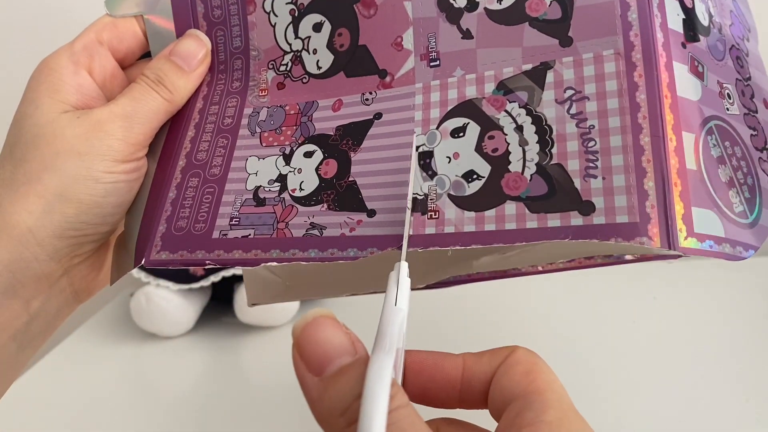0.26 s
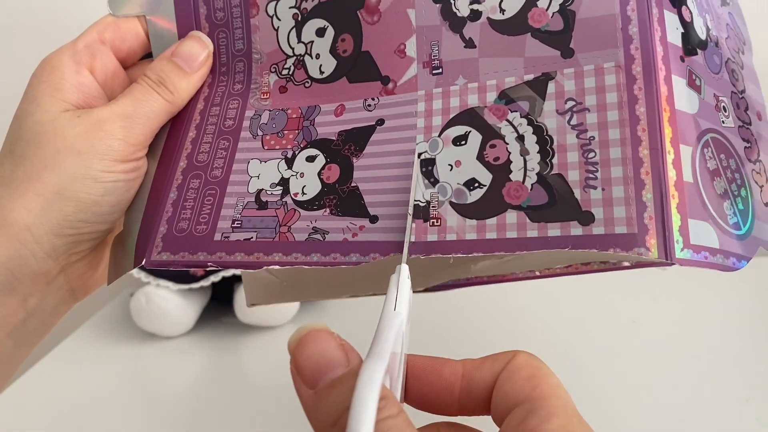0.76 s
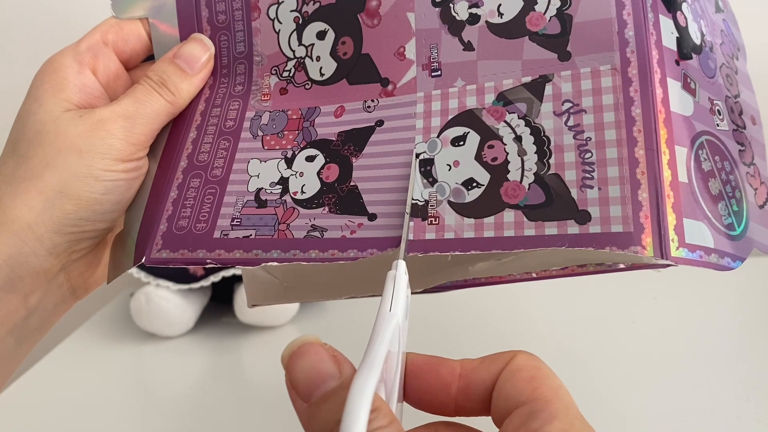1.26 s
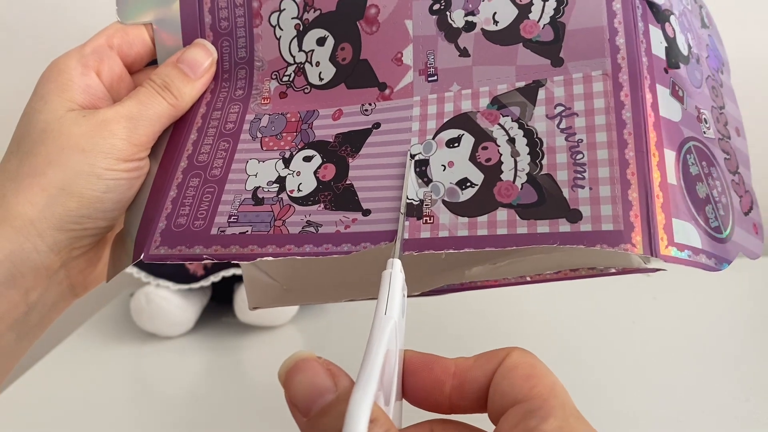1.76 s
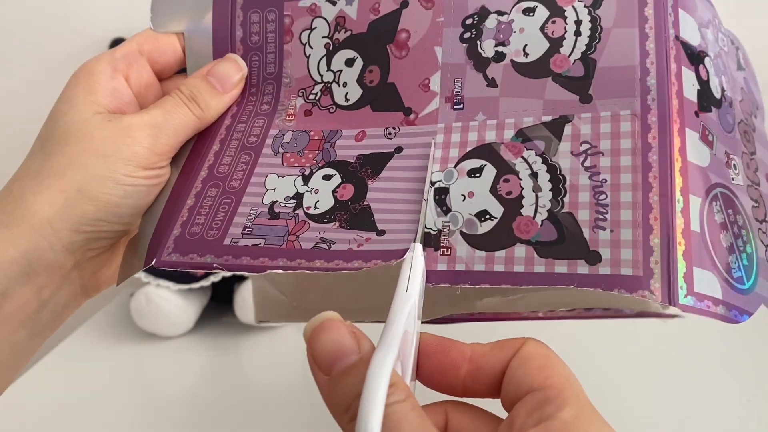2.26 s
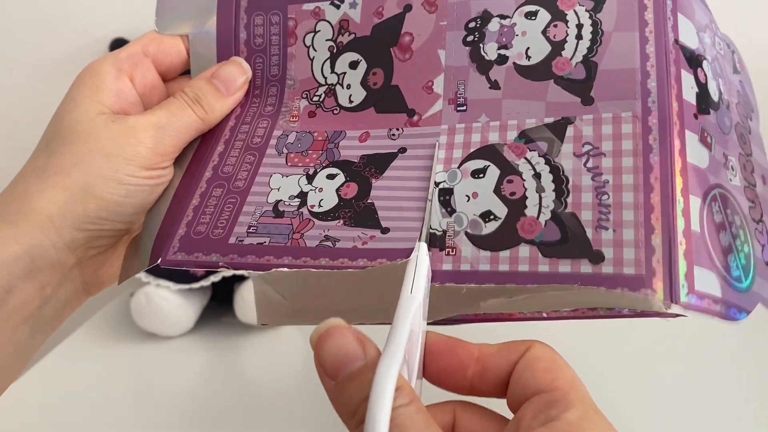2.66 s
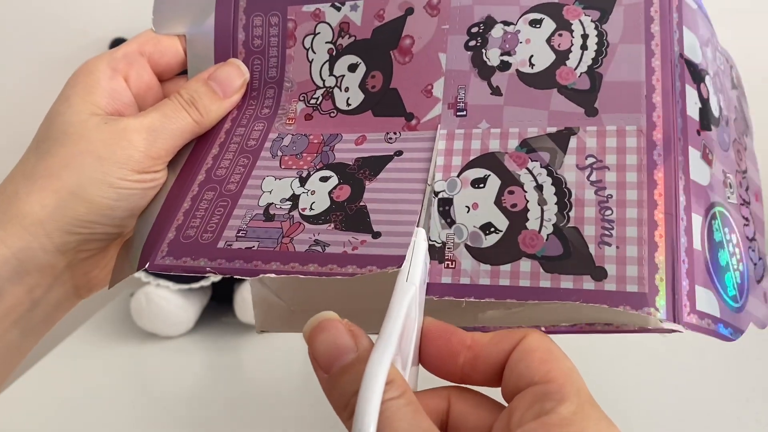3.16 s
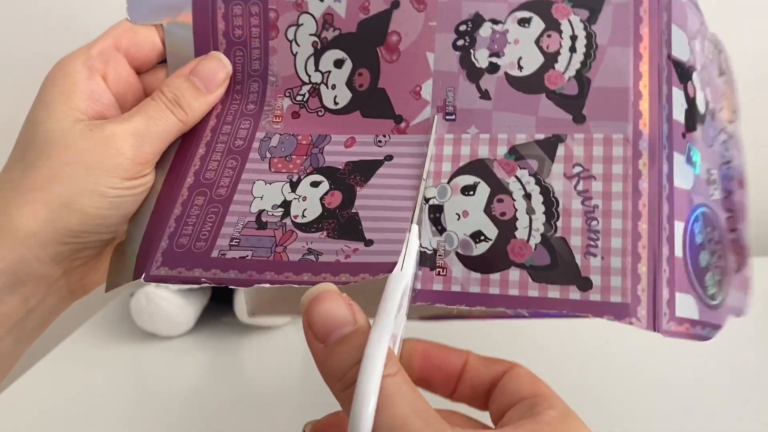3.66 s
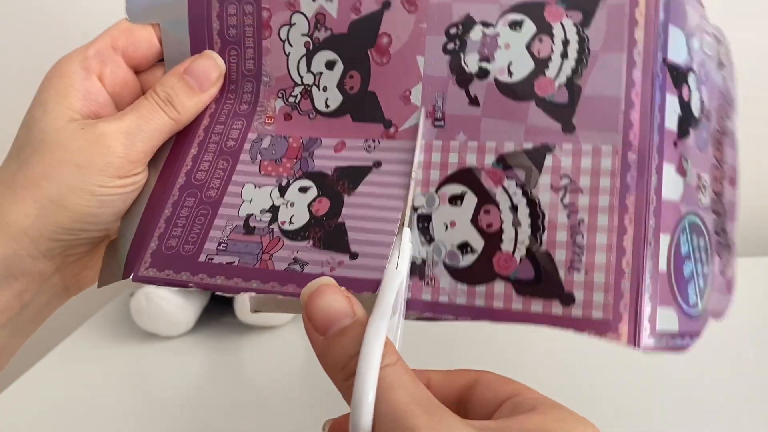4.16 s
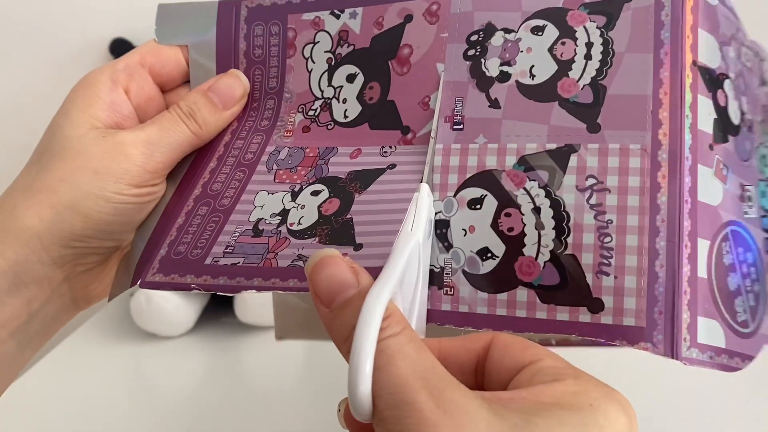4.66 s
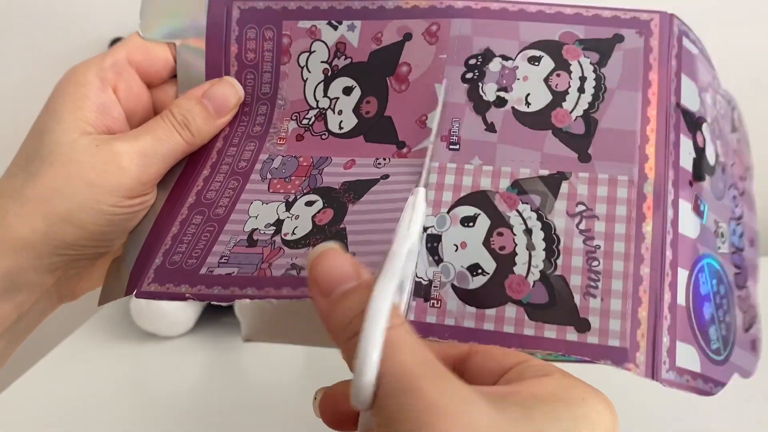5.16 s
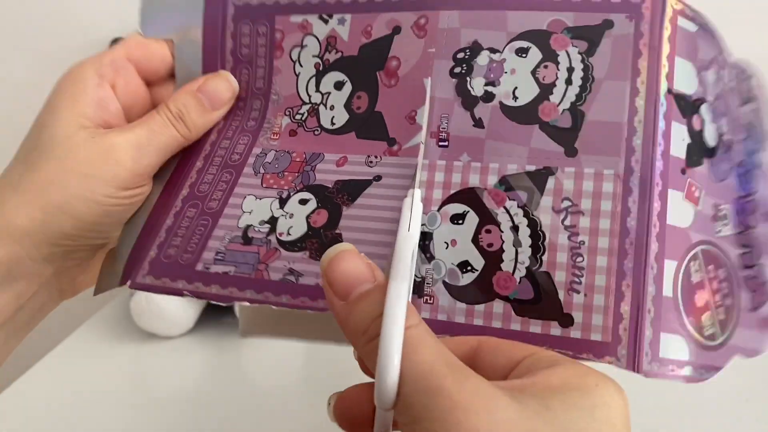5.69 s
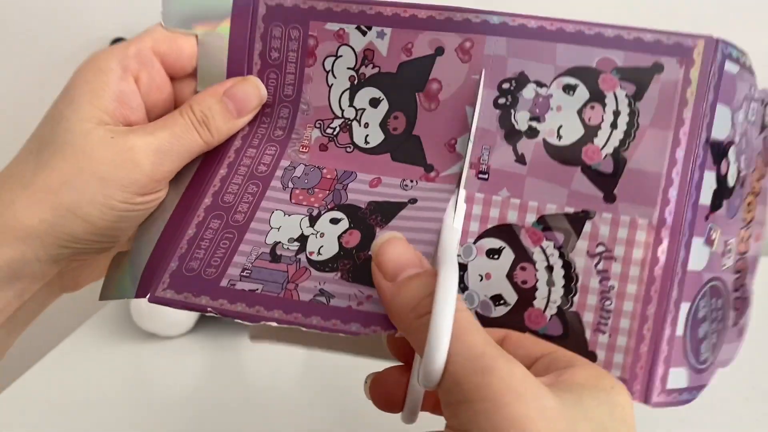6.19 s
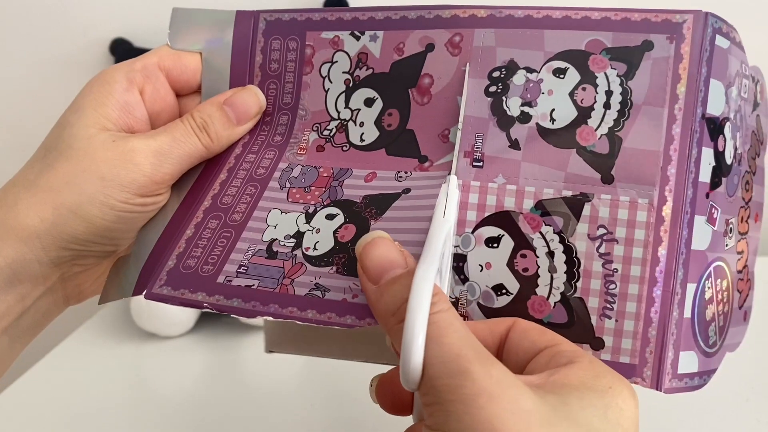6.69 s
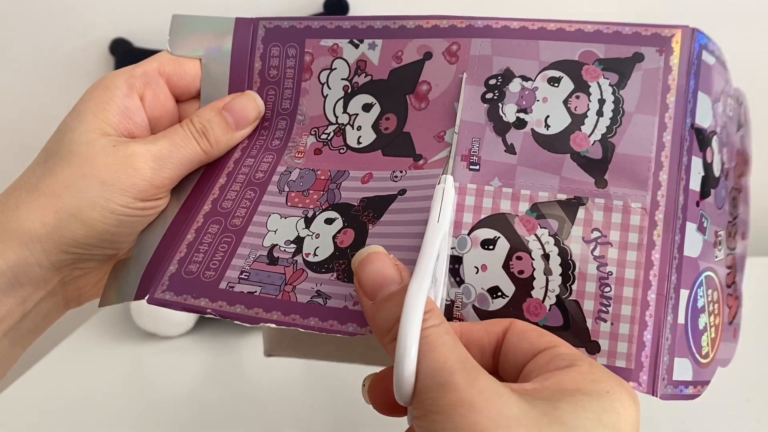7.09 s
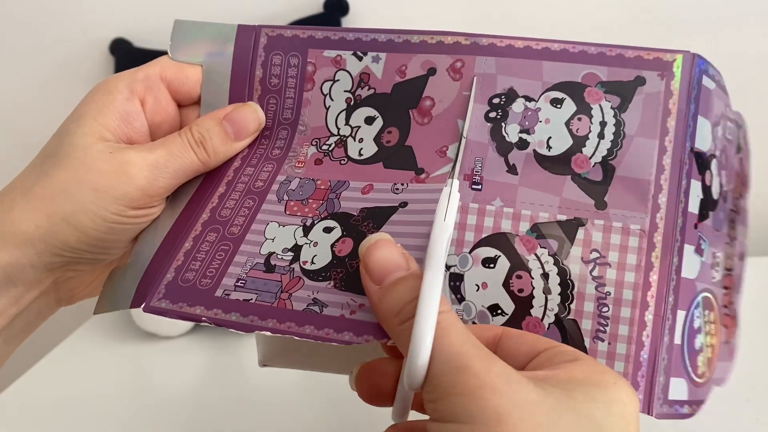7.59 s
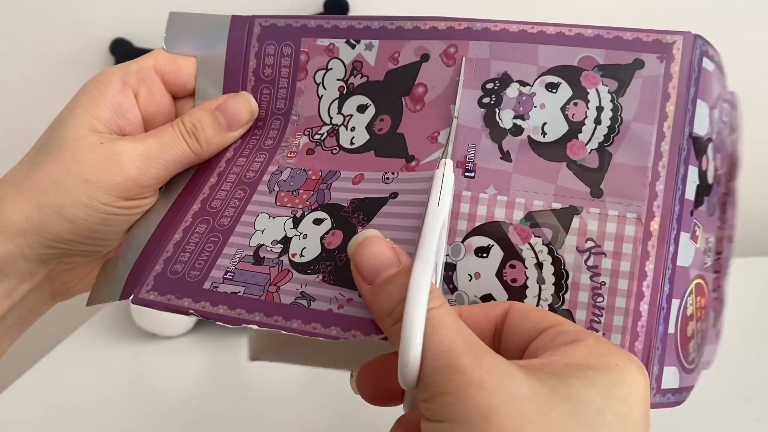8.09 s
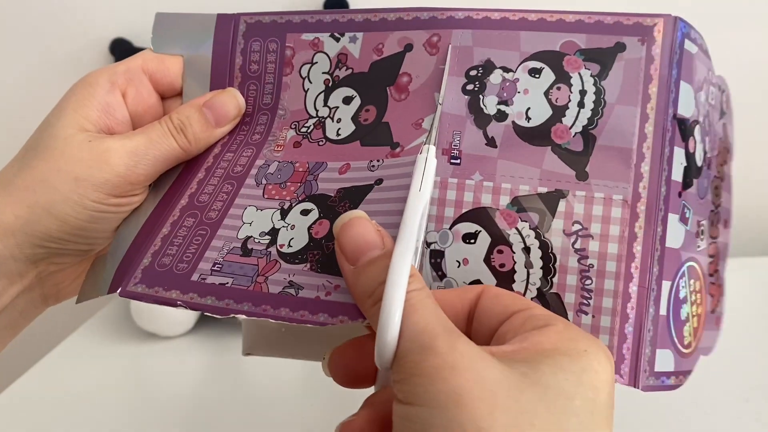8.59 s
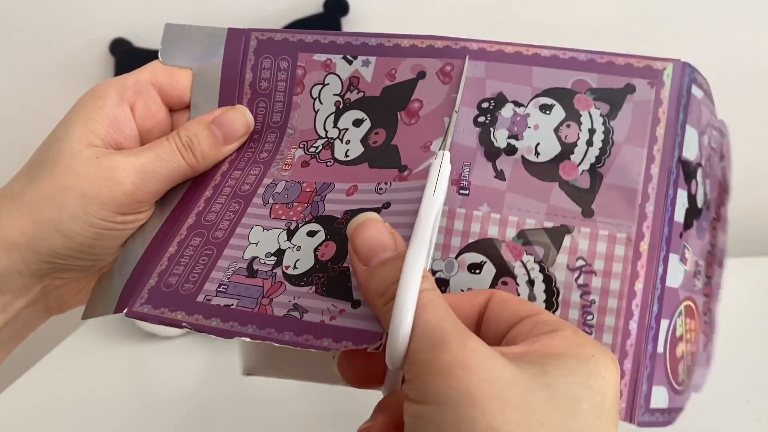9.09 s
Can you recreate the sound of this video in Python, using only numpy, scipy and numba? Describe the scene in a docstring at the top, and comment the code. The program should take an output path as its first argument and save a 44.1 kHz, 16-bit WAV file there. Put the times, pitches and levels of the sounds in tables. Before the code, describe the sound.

Small scissors cut through thin cardboard, close to the microphone and somewhat to the left, in a small quiet room with a faint low hum. A faint scrape opens at about 0.3 seconds. From 0.6 seconds the card sticks and slips on the blades in soft, irregular crunchy ticks, which grow into firmer cracks between 1.5 and 3 seconds. Dry, grainy scraping of blades and fingers fills the gaps. From 3 seconds the loose side of the sheet flaps softly now and then. The blades creak briefly near 4.4 and 6.3 seconds, and sharper snaps stand out around 3.9, 4.9 and 5.8 seconds. The hardest cracks come in a run from 6.8 to 7.3 seconds and, after lighter crunching, in a tight burst at 8.7 seconds. A short scrape follows at 9 seconds, and a last pair of cracks lands at 9.3 seconds.

```python
"""Small scissors work through a sheet of thin card, close in front of a phone in a quiet room.
A faint scrape opens, then the card sticks and slips on the blades: each slip cracks and rings the damped
modes of the sheet, the slow bass ones last. In between, blades and fingers scrape it with dense grains.
From 3 s the free side flaps now and then, and the blades creak near 4.4 s and 6.3 s.
The hardest cracks come late, around 7 s and 8.7 s, and a last pair lands at 9.3 s."""
import sys
import numpy as np
from scipy import signal
from scipy.fft import rfft, irfft, next_fast_len
from scipy.io import wavfile
from scipy.ndimage import uniform_filter1d
from numba import njit

SR = 44100
rng = np.random.default_rng(int(sys.argv[2]) if len(sys.argv) > 2 else 0)


def persist_wave(psi):
    """Save psi, clipped to +-1, as 16-bit WAV."""
    counts = np.round(np.clip(psi, -1, 1) * 32767).astype(np.int16)
    wavfile.write(sys.argv[1], SR, np.atleast_2d(counts).T)


N = 411878
TEAR = np.arange(-256, 512)  # samples around a break

# creaks, runs of small slips: start_s, end_s, first_rate_hz, last_rate_hz, ring_db, crack_db, looseness
CREAKS = [(4.337, 4.425, 165, 110, -44, -15, .06), (4.525, 4.56, 70, 66, -44, -15, .01),
          (6.214, 6.295, 104, 104, -45, -5, .02), (6.298, 6.376, 74, 62, -44, -12, .01)]


def undb(db):
    """Decibels to gain."""
    return 10 ** (np.asarray(db) / 20)


def unit(x):
    """Scale to rms 1."""
    return x / np.sqrt(np.mean(x ** 2))


def walk(rate_hz):
    """Glides between random values; spread near 1."""
    hold = int(SR / rate_hz)
    return 1.137 * uniform_filter1d(np.repeat(rng.standard_normal(N // hold + 1), hold), hold)[:N]


def curves(rows):
    """Automation: one curve for each column after the time in seconds."""
    times, *columns = np.transpose(rows)
    return [np.interp(np.arange(N) / SR, times, column) for column in columns]


def swells(rows, steep, rest_db):
    """Level in dB of swells piled on a resting level; edges move 20 * steep dB per rise or fall time."""
    power = np.full(N, undb(2. * rest_db))
    for start, end, first_db, last_db, rise, fall in rows:
        span = np.arange(max(int((start - 3 * rise) * SR), 0), min(int((end + 3 * fall) * SR), N))
        t = span / SR
        edge = np.maximum(start - t, 0) / rise + np.maximum(t - end, 0) / fall
        power[span] += undb(2 * (np.interp(t, (start, end), (first_db, last_db)) - 20 * steep * edge))
    return 10 * np.log10(power)


def room_tone(level_db=-66):
    """A bed of low hum and microphone hiss; the bass is alike left and right."""
    # spectrum of the bed: frequency_hz, density_db
    spectrum = [(18, -42.5), (30, -2), (42, 6), (65, -13), (167, -24.5), (276, -17), (1450, -39.5),
                (16500, -53.5)]
    hz, db = np.transpose(spectrum)
    n = next_fast_len(N)
    f = np.maximum(np.arange(n // 2 + 1) * SR / n, 1)
    colour = undb(np.interp(np.log(f), np.log(hz), db))
    mid, side = rfft(rng.standard_normal((2, n))) * colour
    side *= np.clip(.25 + f / 2000, 0, 1)
    return undb(level_db) * unit(irfft(np.array([mid + side, mid - side]), n))[:, :N]


def walls(x, wet_db=-16, t60_s=0.38, damp_hz=5000):
    """A small room: a short diffuse tail, with its own echoes on each side."""
    t = np.arange(int(.4 * SR)) / SR
    tail = rng.standard_normal((2, len(t))) * 1000. ** (-t / t60_s) * (1 - np.exp(-t / .004))
    tail = signal.lfilter(*signal.butter(1, damp_hz, fs=SR), tail)
    tail = undb(wet_db) * tail / np.linalg.norm(tail, axis=1, keepdims=True)
    return signal.fftconvolve(x.mean(axis=0, keepdims=True), tail, axes=1)[:, :N]


def flapping():
    """The free side of the sheet trembles and flaps: noise in short swells."""
    # flaps: peak_s, level_db
    flaps = [(3.04, -57), (3.9, -62.5), (4.92, -65), (5.17, -54), (5.499, -51), (6.07, -56.5),
             (7.25, -51.5), (8.06, -51.5), (8.7, -46.5), (9.069, -51), (9.315, -48)]
    rows = [(s, s, db, db, 0.045, 0.023) for s, db in flaps]
    return undb(swells(rows, steep=0.79, rest_db=-75.5)) * unit(rng.standard_normal(N))


def rubbing_db():
    """Ring, hiss and rumble levels of the friction; hiss moves fastest, rumble slowest."""
    # blades pushed steadily in: start_s, end_s, first_ring_db, last_ring_db, hiss_db, rumble_db
    cuts = [(0.602, 1.246, -58, -62.5, -7.5, 4), (1.4, 1.743, -68, -60.5, -0.5, 6),
            (1.929, 1.958, -53, -49.5, 2, -6), (2.14, 2.557, -57.5, -69, -0.5, 6.5),
            (2.894, 3.165, -55, -71.5, 3, 8), (3.282, 3.297, -44.5, -56.5, 3.5, 1.5),
            (3.533, 4.016, -64.5, -57, -2.5, 2.5), (4.11, 4.303, -57.5, -51.5, -5, 1.5),
            (4.42, 4.84, -63.5, -59, 1, 7), (4.9, 5.306, -60, -84, -11, 1),
            (5.612, 5.935, -59.5, -55.5, -13, 2), (6.778, 7.348, -49.5, -63.5, -1, 4),
            (7.78, 7.924, -56, -73.5, 2.5, 6.5), (8.289, 8.425, -59, -70, -4, 6.5),
            (8.657, 8.936, -48, -57.5, -10.5, -1), (9.305, 9.313, -42.5, -70, -3, 12)]
    # card sliding along an edge: peak_s, ring_db, rise_s, fall_s, hiss_db, rumble_db
    scrapes = [(0.259, -63.5, 0.071, 0.13, -6, 5), (1.25, -63, 0.035, 0.29, -17, 12.5),
               (1.52, -50, 0.083, 0.12, 0.5, 10), (2.009, -43, 0.16, 0.024, -3.5, -1.5),
               (2.707, -40.5, 0.054, 0.077, -5.5, 0.5), (3.046, -49, 0.011, 0.056, 6.5, 12.5),
               (3.619, -44, 0.065, 0.03, -14, 0), (3.686, -39.5, 0.031, 0.014, -6.5, 6),
               (3.757, -47.5, 0.021, 0.02, -6, 9.5), (4.485, -56, 0.023, 0.048, 0, 5),
               (4.614, -45.5, 0.057, 0.044, 0.5, -2), (5.004, -56, 0.1, 0.038, 2.5, -6),
               (5.189, -49, 0.29, 0.19, -1, 2.5), (5.468, -39, 0.041, 0.068, -4, -4),
               (5.68, -45, 0.048, 0.029, -7.5, -2), (5.778, -41.5, 0.085, 0.089, -1, 7),
               (6.038, -45, 0.054, 0.077, -1, 4.5), (6.281, -45.5, 0.13, 0.11, 1.5, 10.5),
               (6.51, -56.5, 0.038, 0.058, -3, 1), (6.61, -54.5, 0.11, 0.083, -14, 2),
               (6.72, -53, 0.081, 0.13, -10, 6), (7.16, -47, 0.029, 0.32, -7, 0),
               (7.474, -39, 0.093, 0.12, -8, -1.5), (7.998, -45, 0.083, 0.16, -5.5, 3),
               (8.18, -52, 0.038, 0.097, -16, -4), (9.021, -28, 0.058, 0.045, -17, -8),
               (9.079, -47.5, 0.15, 0.094, -7.5, 1)]
    # card held still: ring_db, hiss_db, rumble_db
    rest_db = (-108.5, -88, -77.5)
    rows = [(start, end, first, last, 0.025, 0.14, 0, *rel) for start, end, first, last, *rel in cuts]
    rows += [(s, s, db, db, rise, fall, 0, *rel) for s, db, rise, fall, *rel in scrapes]
    levels = []
    for band, steep in enumerate((1, 1.19, 0.89)):  # a stroke's hiss and rumble are relative to its ring
        strokes = [(start, end, first + rel[band], last + rel[band], rise, fall)
                   for start, end, first, last, rise, fall, *rel in rows]
        levels.append(swells(strokes, steep, rest_db[band]))
    return levels


def grains(scatter_db, patchy_db, width):
    """Dense fibre grains of very uneven size that come in patches."""
    size_db = scatter_db * np.minimum(rng.exponential(size=N), 5)
    size_db += patchy_db * (walk(200) + walk(70) / 2)
    noise = rng.standard_normal((3, N))
    return unit(undb(size_db) * (np.sqrt(1 - width) * noise[0] + np.sqrt(width) * noise[1:]))


def creaks(thud_db=-16, uneven_db=3):
    """The blades stick and let go in quick runs, most of them slowing: one slip row a tick."""
    ticks = []
    for start, end, first_hz, last_hz, ring_db, crack_db, looseness in CREAKS:
        s, chance = start, iter(rng.uniform(0.35, 1, size=(64, 2)))
        while s < end:
            late, strong = next(chance)
            ticks.append((s, ring_db + uneven_db * strong, crack_db, thud_db))
            s += (1 + looseness * late) / np.interp(s, (start, end), (first_hz, last_hz))
    return ticks


def tears(fuzz, rise_s=.001, fall_s=.0041):
    """Force of each slip: fibres tear ever faster up to one sharp break, then settle; energy 1."""
    t = TEAR / SR
    length, ragged = undb(rng.uniform(-6, 3, (len(fuzz), 2))).T[:, :, None]
    force = rng.standard_normal((len(fuzz), len(t))) * np.exp(np.minimum(t / rise_s, -t / (fall_s * length)))
    force *= fuzz[:, None] * ragged / np.linalg.norm(force, axis=1, keepdims=True)
    force[:, TEAR == 0] += 1
    return force / np.linalg.norm(force, axis=1, keepdims=True)


@njit
def resonate(push, pole, gain):
    """A complex one-pole on each channel, retuned every 64 samples."""
    out = np.empty(push.shape)
    for c in range(2):
        z = 0j
        for i in range(push.shape[1]):
            z = z * pole[i >> 6] + push[c, i] + 1e-18
            out[c, i] = (gain[c] * z).imag
    return out


def sheet_mode(push, hz, t60_s, wander=.035):
    """One damped mode at both microphone ports; its pitch slides as the sheet bends."""
    # microphone ports: frequency_hz, left_lead_rad, left_minus_right_db
    ports = [(60, -0.2, 2), (167, -0.11, -5), (510, -0.35, -3.5), (970, 0.83, -2.5), (1380, 0.091, -2.5),
             (2530, 0.73, -6.5), (4440, -1.1, -5), (16000, 0.02, -10)]
    port_hz, lead, lean_db = np.transpose(ports)
    half, lookup = np.array([.5, -.5]), (np.log(hz), np.log(port_hz))
    stereo = undb(half * np.interp(*lookup, lean_db)) * np.exp(1j * half * np.interp(*lookup, lead))
    radius = np.exp(-np.log(1000) / (t60_s * SR))
    bent_hz = np.minimum(hz * (1 + wander * walk(6)[::64]), SR / 2.2)
    pole = radius * np.exp(2j * np.pi * bent_hz / SR)
    return resonate(push, pole, np.sqrt(2 * (1 - radius ** 2)) * stereo)


def mode_focus(modes, grip=None, drift_db=0):
    """Drive of each mode over time: the grip favours those near its centre, or else they may drift."""
    slack = undb(curves([(3.2, 0), (5.2, -9)])[0])  # long clear rings fade as the cut loosens the sheet
    focus = []
    for hz, _, t60_s in modes:
        if grip:
            centre_hz, narrowness = grip
            gain = undb(-narrowness * np.log2(hz / centre_hz) ** 2)
        else:
            gain = undb(drift_db * walk(5))
        focus.append(gain * slack if hz > 700 and t60_s > .035 else gain)
    return np.array(focus)


def mode_family(modes, force, slip_db, friction, hits, **focusing):
    """Slips strike one family of the sheet's modes while friction keeps it sounding."""
    at, sides, reach = hits
    hz, db, t60_s = np.transpose(modes)
    friction = friction * undb(1.7 * walk(30))  # each family flickers alone: the crunch shifts colour
    share = undb(db) / np.linalg.norm(undb(db))
    strike = share * undb(3.5 * rng.standard_normal((len(at), len(hz))))
    focus = mode_focus(modes, **focusing)
    strike *= focus[:, at].T
    strike *= undb(slip_db)[:, None] / np.linalg.norm(strike, axis=1, keepdims=True)
    # even out what reaches each mode, however ragged the tear
    strike /= np.maximum(abs(force @ np.exp(2j * np.pi * TEAR[:, None] * hz / SR)), .6)
    beam_db = min(hz[0] / 900, 7000 / hz[0])  # high modes beam left or right
    aim = undb(beam_db * rng.standard_normal(strike.shape))
    sound = 0
    for k in range(len(hz)):
        lag_s = reach * .05 / np.sqrt(hz[k]) - .0022  # low bending waves travel slower
        span = (at + (lag_s * SR).astype(int))[:, None] + TEAR
        gains = strike[:, k] * sides * [aim[:, k], 1 / aim[:, k]]
        blows = [np.bincount(span.ravel(), (force * gain[:, None]).ravel(), N)[:N] for gain in gains]
        push = np.array(blows) + share[k] * focus[k] * friction
        sound += (-1) ** k * sheet_mode(push, hz[k], t60_s[k])
    # the high-pass keeps each family clean of bass below its lowest mode
    return signal.sosfilt(signal.butter(2, .6 * hz[0], "high", fs=SR, output="sos"), sound)


def card():
    """Scissors in the card: slips, creaks and scraping all drive the same modes of the sheet."""
    # slips: time_s, ring_db, crack_db, thud_db (the last two relative to the ring; all before trims)
    slips = [(0.647, -58, 9, -10), (0.677, -57, 0, -8), (0.699, -54.5, 5, 3), (0.736, -64, 1, -10),
             (0.775, -45, -11, -14), (0.808, -48.5, -5, -10), (0.893, -54, 7.5, -14),
             (0.938, -51.5, -3, -9), (0.967, -49.5, -8, -7), (1.003, -45, -6, -12), (1.042, -40, -6, -0.5),
             (1.092, -52.5, 12.5, 10.5), (1.172, -51, 1, -1), (1.233, -44.5, 5, 1), (1.25, -47.5, 2, -2),
             (1.259, -53, 8, 7), (1.298, -59, 4, -16), (1.377, -51, -6, 0), (1.405, -50, -7, -6),
             (1.416, -45, -6, 0), (1.445, -43.5, 3, -4), (1.461, -44, 1, -1), (1.506, -38, -9, -9),
             (1.539, -40, -8, -13), (1.599, -36, 1, -9), (1.664, -30.5, -4, -12), (1.713, -41, 7, -1),
             (1.75, -34.5, -4.5, -10), (1.874, -38, -0.5, -5), (1.994, -26.5, -3.5, -15),
             (2.131, -50, 0, -22), (2.147, -37.5, -1, -9), (2.182, -40.5, 0, -24), (2.207, -37, -10, -8),
             (2.222, -35, 5, -7), (2.273, -32.5, -8, -14), (2.304, -43.5, 4.5, -14), (2.352, -28, -6, -6.5),
             (2.42, -33.5, -3, -4.5), (2.426, -36.5, 5.5, 1), (2.476, -39.5, 5, -4),
             (2.497, -26.5, 0.5, -7), (2.662, -38, 1.5, -3), (2.687, -37, 5, -4), (2.704, -31.5, -21, -8),
             (2.904, -30.5, -0.5, -13), (2.919, -34, -0.5, -7.5), (2.951, -29.5, 4, -6),
             (3.021, -27, 3, -8.5), (3.103, -24.5, 2.5, -15), (3.259, -48, -25, -7), (3.557, -39.5, 0.5, 1),
             (3.687, -34.5, -10, -6), (3.873, -24, -0.5, -9.5), (4.006, -27.5, -3, -11),
             (4.185, -34, -17, -12), (4.566, -31.5, -1, -12), (4.605, -38.5, -8, -9), (4.645, -40, -9, -25),
             (4.708, -37.5, -2, -31), (4.718, -42.5, 8.5, -29), (4.745, -42, -10, -16), (4.76, -44, 2, -18),
             (4.788, -33.5, -6, -12), (4.793, -37.5, -0.5, -24), (4.82, -31, -5, -12),
             (4.83, -32.5, 0, -11.5), (4.849, -30.5, -7, -4.5), (4.892, -23, -14, -15),
             (4.904, -18, -1.5, -6), (5.102, -37.5, 0.5, -6.5), (5.179, -31, -11, -7),
             (5.228, -43.5, 4.5, -12), (5.411, -36.5, -8.5, 6), (5.476, -28.5, -0.5, -2.5),
             (5.625, -34.5, -3.5, -31), (5.681, -34, -14, -9), (5.758, -25.5, -4, -12),
             (5.772, -18, -9.5, -3), (5.827, -45, 11, -8), (6.005, -35.5, -7, -1.5), (6.034, -41.5, -8, 7),
             (6.397, -41, -8.5, -13), (6.487, -41.5, -3.5, -11), (6.619, -38.5, -5.5, -11),
             (6.676, -36, -16, -10), (6.714, -39, -8.5, -20), (6.759, -37, -16, -14),
             (6.789, -15, -5.5, -16), (6.844, -31, -23, -15), (6.864, -14, -2.5, -21.5),
             (6.903, -27.5, -14, -7.5), (6.953, -30, -7, -25), (6.958, -20, -2.5, -15),
             (7.05, -23.5, -14, -19), (7.062, -19.5, -11.5, -11), (7.101, -19, -16, -26),
             (7.107, -16.5, -3.5, -8.5), (7.195, -20, -12, -12), (7.202, -18.5, -6.5, -7.5),
             (7.216, -29.5, 3, -2), (7.247, -22, -15, -20), (7.251, -12.5, -11, -12),
             (7.488, -34.5, -21, -5.5), (7.692, -45, -35, 0.5), (7.789, -31.5, 8, 2),
             (7.861, -48.5, -12, -4), (7.936, -43, -3, -15), (7.957, -35, 3, -2.5), (7.984, -40, 1.5, 0),
             (8.003, -29.5, -1.5, -18), (8.05, -35.5, -1, -5), (8.095, -38.5, -4, -13),
             (8.297, -27.5, -14.5, -6.5), (8.452, -46, -22.5, -7.5), (8.652, -12.5, -4.5, -17),
             (8.662, -17.5, -9.5, -24), (8.692, -13, -7.5, -16), (8.707, -20.5, -9, -17),
             (8.721, -19.5, -9, -13), (9.027, -25, -19, -8), (9.038, -23.5, -32.5, -18.5),
             (9.286, -16.5, -9.5, -17), (9.3, -19.5, -7.5, -22)]
    # the sheet's five mode families, bass to top: pitch_hz, level_db, t60_s
    flap_modes = [(64, -3.5, 0.16), (105, -6, 0.086)]
    thud_modes = [(142.2, 2, 0.13), (235.7, 1.3, 0.041), (319.7, 2.4, 0.032), (389, 2.5, 0.015),
                  (525, 2.9, 0.053), (658, 1.3, 0.029)]
    ring_modes = [(744, 3.5, 0.07), (926.3, 7, 0.015), (1004, 0.5, 0.023), (1080, -7.5, 0.068),
                  (1161, 6.5, 0.0058), (1290.7, 7, 0.011), (1446, 4.5, 0.0075), (1657, 5.5, 0.018),
                  (1809, 4, 0.0086)]
    crack_modes = [(2343, 2.5, 0.0052), (2848, 2, 0.0049), (3253, 2.2, 0.0055), (3845, 3, 0.0059),
                   (4278, 3.9, 0.0076), (4840, 0.67, 0.0032)]
    sheen_modes = [(6240, -1, 0.0026), (7700, 0.5, 0.0031), (10420, -1, 0.0012), (12210, -2.5, 0.0012),
                   (14400, -3, 0.0012)]
    # grip of the blades: time_s, ring_centre_hz, narrowness_db_per_octave_squared, thud_centre_hz
    grip = [(0.74, 1093, 60, 202), (3.4, 1160, 15, 288), (4.77, 1160, 17, 228), (5.03, 1630, 35, 212),
            (5.1, 1000, 11, 267), (5.8, 955, 17.5, 354), (6.33, 1390, 24, 330), (6.75, 1220, 37, 435),
            (7.67, 923, 13, 402), (7.99, 1470, 26.5, 268), (8.3, 927, 22.5, 250), (8.69, 1377, 32.5, 477),
            (9.05, 947, 12.5, 424), (9.3, 1430, 12, 204)]
    # brightness where blades meet card: time_s, sheen_over_crack_db
    blades = [(0.0, -7), (1.69, -10.5), (1.99, 1), (2.2, -17.5), (2.69, -6.5), (2.89, -18), (3.34, -7),
              (3.51, -17), (4.24, -15), (5.97, -8.5), (6.39, -30), (6.64, -4.5), (7.94, -15.5), (9.33, -4)]
    # stereo position: time_s, left_minus_right_db
    pan = [(0, 10.5), (3, 7), (9.298, 8.5)]
    ring_hz, narrowness, thud_hz = curves(grip)
    bright_db, pan_db = curves(blades) + curves(pan)
    lean = undb(np.array([pan_db, -pan_db]) / 2)
    low_db = -10 * np.log10(1 + undb(2 * bright_db))  # crack and sheen share the treble power
    top_db = low_db + bright_db

    time_s, ring_db, crack_db, thud_db = np.transpose(list(slips) + creaks())
    at = (time_s * SR).astype(int)
    is_slip = np.arange(len(at)) < len(slips)
    bass_db, treble_db = ring_db + thud_db, ring_db + crack_db
    sheen_db = treble_db + top_db[at] + np.where(is_slip, 0, -15)  # creak ticks are duller
    fuzz = np.where(is_slip, np.interp(ring_db, (-50, -25), (2, 1)), .3)  # weak slips crumble most
    jolt, rip = tears(.9 * fuzz), tears(2.6 * fuzz)  # one jolt for the body, ripping fibres on top
    hits = at, lean[:, at], rng.uniform(.2, 1.1, len(at))  # sample, pan gains, path through the sheet

    mid_db, hiss_db, rumble_db = rubbing_db()
    rub = grains(scatter_db=2.8, patchy_db=4, width=.25) * lean
    grit = grains(scatter_db=2.5, patchy_db=3.6, width=.06) * lean  # finer grains on the coating
    for start, end, *_ in CREAKS:  # blades that stick and creak slide less
        rub[:, int(start * SR):int(end * SR)] *= undb(-8)

    flap = mode_family(flap_modes, jolt, bass_db + 14, undb(12) * flapping(), hits)
    thud = mode_family(thud_modes, jolt, bass_db + 24, undb(rumble_db + 1) * rub, hits,
                       grip=(thud_hz, 5))
    ring = mode_family(ring_modes, jolt, ring_db + 22, undb(mid_db + 9) * rub, hits,
                       grip=(ring_hz, narrowness))
    crack = mode_family(crack_modes, rip, treble_db + low_db[at] + 12,
                        undb(hiss_db + low_db + .5) * rub, hits, drift_db=1.8)
    sheen = mode_family(sheen_modes, rip, sheen_db + 13.5,
                        undb(hiss_db + top_db + 4.5) * grit, hits, drift_db=1.8)
    return flap + thud + ring + crack + sheen


def scene():
    """The card up close, its room tail and the room tone."""
    near = card()
    return near + walls(near) + room_tone()


def record(dry):
    """The phone cuts the deepest bass and the top."""
    x = signal.sosfilt(signal.butter(3, 48, "high", fs=SR, output="sos"), dry)
    return signal.sosfilt(signal.ellip(8, .2, 70, 16000, fs=SR, output="sos"), x)


dry = scene()
out = record(dry)
persist_wave(out)
```